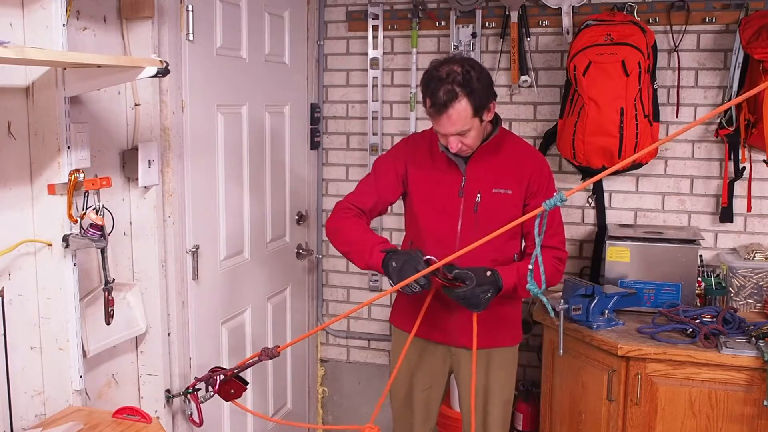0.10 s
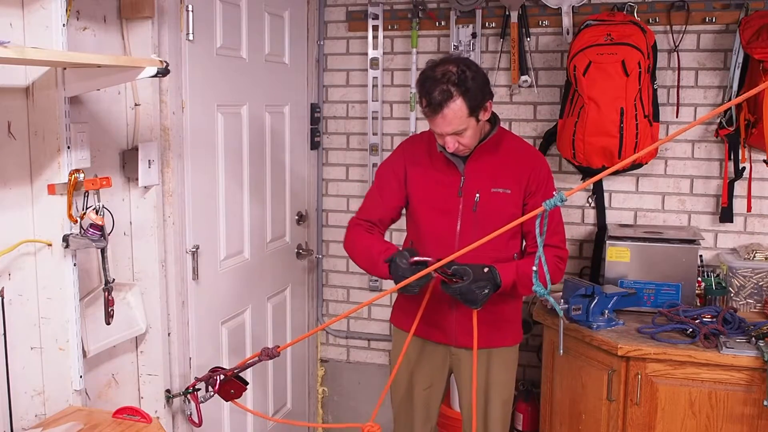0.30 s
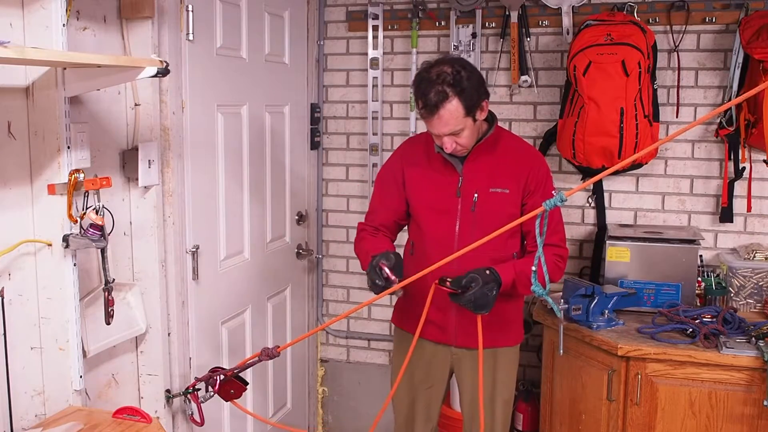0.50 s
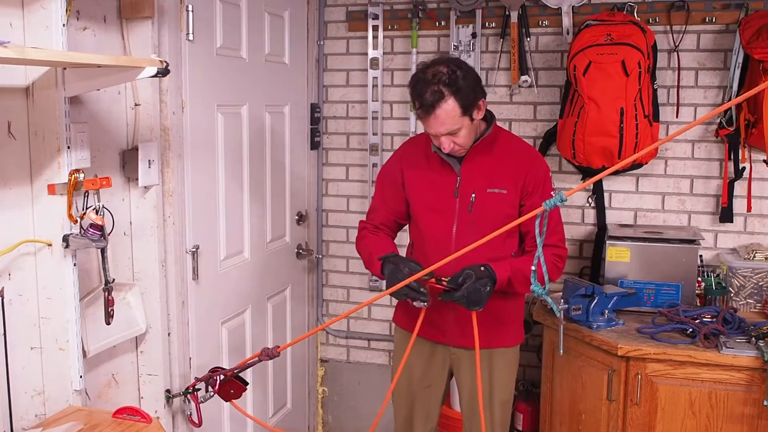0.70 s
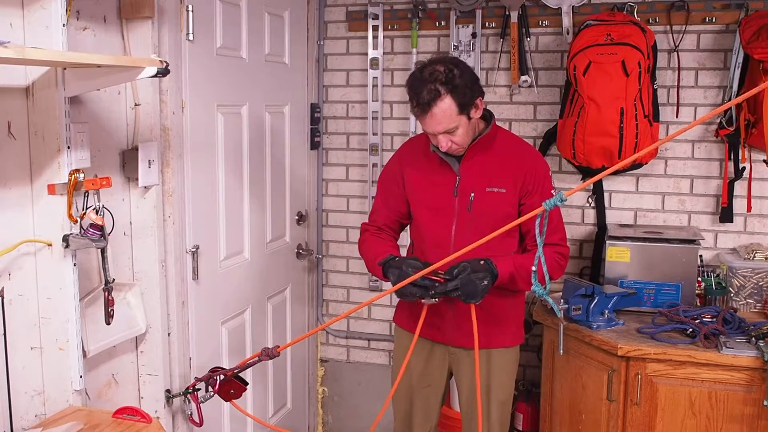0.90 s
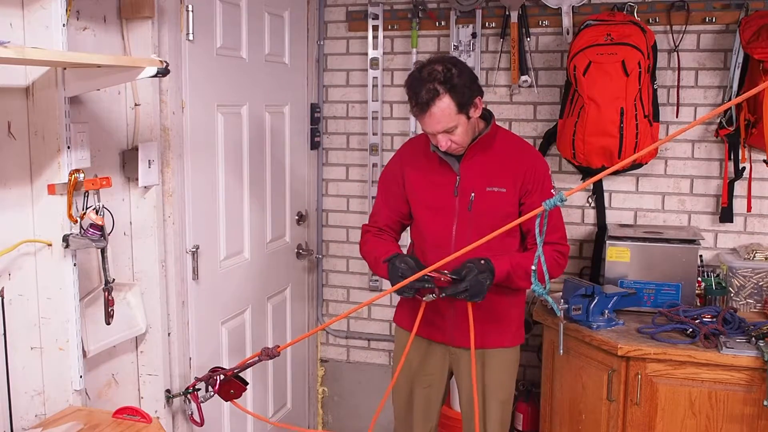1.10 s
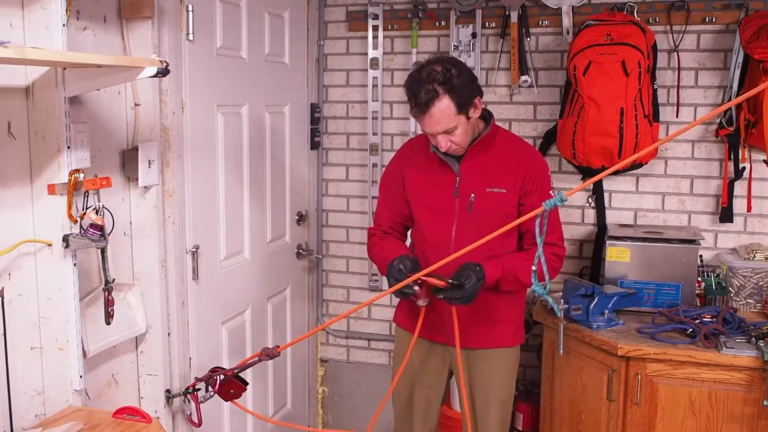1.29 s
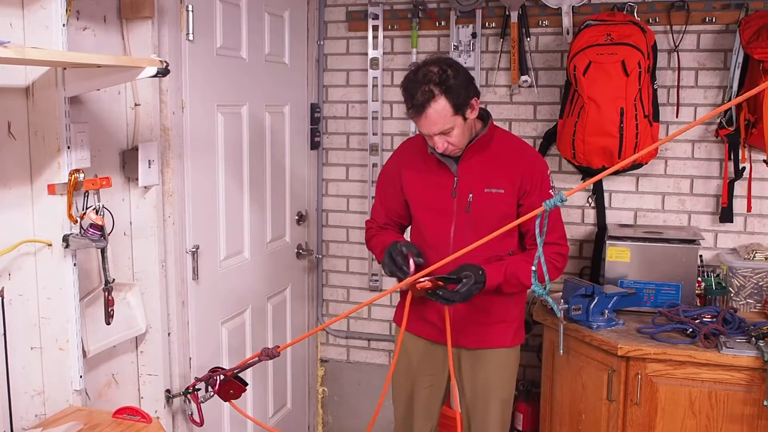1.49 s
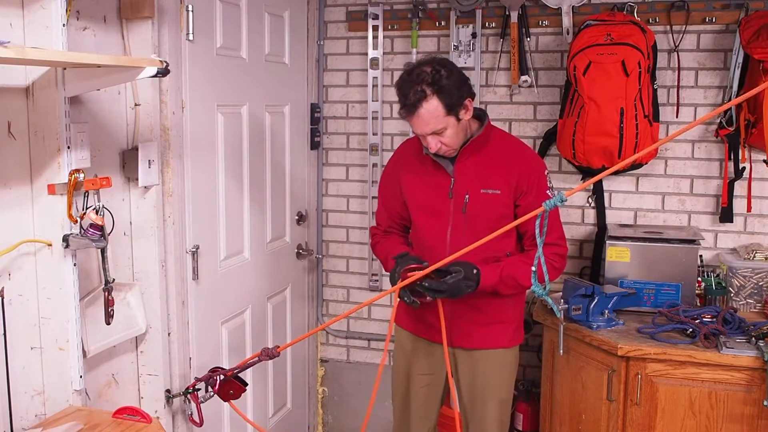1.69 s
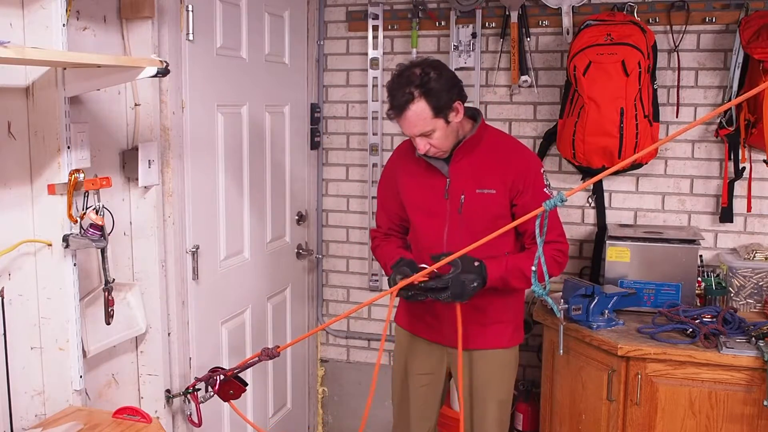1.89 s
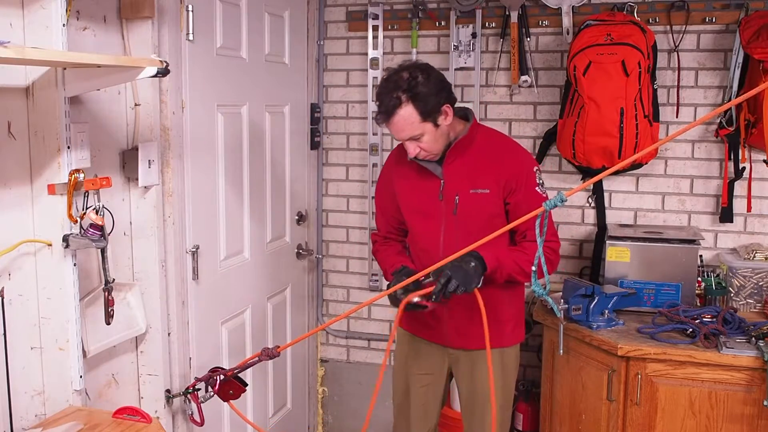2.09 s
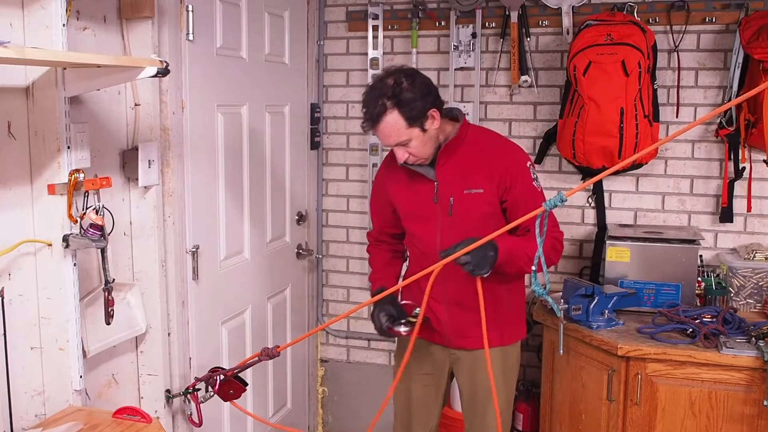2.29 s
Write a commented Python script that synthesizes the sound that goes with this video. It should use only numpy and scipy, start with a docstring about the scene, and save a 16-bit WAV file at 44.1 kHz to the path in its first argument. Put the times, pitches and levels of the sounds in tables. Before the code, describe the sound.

Metal carabiners and a pulley knock together: loud clacks and a bright click early, two firm double clacks mid-way, then lighter ringing clinks, over faint air hum and rope rustle, a few metres away in a reverberant garage.

```python
"""In a hard-walled garage, two metal carabiners and a pulley knock together in a person's hands, a few metres
from a stereo camera. Each knock is a short noise crack plus decaying sine modes of the struck piece; a random
tail with a decay for each band is the garage's answer. The two loudest overload the recorder with a one-sided
low thump, and one carabiner slides in a chatter of small contacts. Shaped noise makes the faint hum of air,
a low bump and a rustle."""
import sys
import numpy as np
from scipy import signal
from scipy.fft import rfft, irfft
from scipy.io import wavfile
from scipy.ndimage import uniform_filter1d

SR = 44100
rng = np.random.default_rng(int(sys.argv[2]) if len(sys.argv) > 2 else 0)


def volts_from_db(level):
    """Convert decibel levels to linear amplitude ratios."""
    exponent = np.asarray(level, float) / 20
    return 10 ** exponent


def inscribe(sig):
    """Save sig as 16-bit PCM at rate SR to the path in sys.argv[1].

    A 1-D sig is mono; a 2-D sig holds one channel per row.
    Samples are clipped to [-1, 1] before scaling.
    """
    pcm = np.round(np.clip(np.atleast_2d(sig).T, -1, 1) * 32767)
    wavfile.write(sys.argv[1], SR, pcm.astype(np.int16))


N = 105840  # samples, 2.4 s


def evened(x):
    """Normalization: scale to unit root mean square."""
    return x / np.sqrt(np.mean(x ** 2) + 1e-20)


def read(points, hz):
    """Spectral interpolation: a curve's value at any frequency, linear in log frequency."""
    f, value = np.transpose(points)
    return np.interp(np.log(hz + 1), np.log(f + 1), value)


def coloured(x, gain_db):
    """Minimum-phase filtering: the gain at each FFT bin alone fixes a causal response."""
    log_gain = np.log(volts_from_db(np.concatenate([gain_db, gain_db[-2:0:-1]])))
    spectrum = np.exp(np.conj(signal.hilbert(log_gain)))
    taps = np.fft.ifft(spectrum).real[:len(gain_db)]
    taps = taps.reshape((1,) * (x.ndim - 1) + (-1,))
    return signal.fftconvolve(x, taps, axes=-1)[..., :x.shape[-1]]


# Left-right correlation of the diffuse sound: pitch_hz, correlation
LIKENESS = [(60, 0.44), (240, 0.37), (950, 0.74), (3770, 0.42), (15000, -0.19)]


def diffuse_pair(frames, hz):
    """Diffuse-field coherence: two random short-time spectra, correlated by frequency."""
    a, b, c, d = rng.standard_normal((frames, len(hz), 4)).T
    left, other = a + 1j * b, c + 1j * d
    same = np.clip(read(LIKENESS, hz), -1, 1)[:, None]
    return np.array([left, same * left + np.sqrt(1 - same ** 2) * other])


def stereo_noise(colour):
    """Stationary noise: a diffuse pair shaped by a spectral density, at unit level."""
    hz = np.fft.rfftfreq(1024, 1 / SR)
    spectra = diffuse_pair(N // 256 + 5, hz) * volts_from_db(read(colour, hz))[:, None]
    return evened(signal.istft(spectra, nperseg=1024, noverlap=768)[1][:, :N])


# Spectral density of the hum of air: pitch_hz, level_db (per Hz, relative)
AIR_COLOUR = [(12, -36), (20, -25.5), (55, -3.5), (151, -11.5), (287, -17.5), (724, -18), (787, -17),
              (881, -16.5), (1040, -20.5), (1830, -23), (2630, -25.5), (14900, -32.5), (16300, -21)]


def room_tone():
    """Steady broadband noise: the faint hum of air."""
    level_db = -50
    return volts_from_db(level_db) * stereo_noise(AIR_COLOUR)


# Spectral density of the low bump: pitch_hz, level_db (per Hz, relative)
BUMP_COLOUR = [(50, -5), (105, -10), (200, -20), (450, -15.5), (900, -23), (2000, -42)]


def low_bump():
    """Amplitude modulation: low noise under a half-sine envelope makes one soft bump."""
    start_s, length_s, level_db = .63, .14, -49
    u = np.clip((np.arange(N) / SR - start_s) / length_s, 0, 1)
    return volts_from_db(level_db) * np.sin(np.pi * u) * stereo_noise(BUMP_COLOUR)


# Level of the rope and gloves over time: time_s, level_db
RUSTLE_LEVEL = [(0, -55), (.1, -57.5), (.5, -64), (.62, -49.5), (.72, -53), (.8, -71), (1.33, -81),
                (1.4, -53.5), (1.5, -48.5), (1.6, -51), (1.66, -57), (1.9, -57), (2.05, -55), (2.4, -56.5)]
# Spectral density of the rustle: pitch_hz, level_db (per Hz, relative)
RUSTLE_COLOUR = [(290, -42), (500, -21.5), (992, -6.5), (1100, -9), (1180, -16.5), (13700, -19),
                 (16300, -26.5)]


def rustle():
    """Friction noise: rope and gloves as shaped noise that follows a level curve."""
    level_db = np.interp(np.arange(N) / SR, *np.transpose(RUSTLE_LEVEL))
    return volts_from_db(level_db) * stereo_noise(RUSTLE_COLOUR)


# Reverberation time of each band, before the early boost: pitch_hz, t60_s
GARAGE_DECAY = [(500, 0.46), (1320, 0.53), (3480, 0.36), (9190, 0.31), (15000, .25)]


def garage():
    """Statistical reverberation: a fresh stereo tail, each band dying at its own speed."""
    level_db, gap_s = 3, .003
    early_db, early_t60_s = -5, 0.067  # near walls strengthen the start of the tail
    hz, t = np.fft.rfftfreq(256, 1 / SR), np.arange(420) * 64 / SR
    decay = volts_from_db(-60 * t / read(GARAGE_DECAY, hz)[:, None])
    tail = signal.istft(diffuse_pair(len(t), hz) * decay, nperseg=256, noverlap=192)[1]
    tail = tail * (1 + volts_from_db(early_db - 60 * np.arange(tail.shape[1]) / SR / early_t60_s))
    tail = np.pad(tail, ((0, 0), (round(gap_s * SR), 0)))
    return volts_from_db(level_db) * tail / np.linalg.norm(tail[0])


def knock(modes, crack, room_db, level_db, low_db, treble_db, ring_db, crack_t60_s):
    """Impact excitation: a dying contact crack and the modes it sets ringing, direct and through the garage."""
    t, hz = np.arange(SR // 2) / SR, np.fft.rfftfreq(4096, 1 / SR)
    tilt = [(1670, low_db), (3860, 0), (12000, treble_db)]  # Hz, dB
    rise_s = .00022 * volts_from_db(-.92 * level_db)  # softer knocks start more slowly
    rise = np.minimum(t / rise_s, 1)

    colour = read(crack, hz) + read(tilt, hz)
    push = rise * volts_from_db(-60 * np.maximum(t - rise_s, 0) / max(crack_t60_s, .001))
    burst = coloured(rng.standard_normal(len(t)) * push, colour)
    burst = burst / np.sqrt(np.mean(volts_from_db(2 * colour)))  # the colour leaves the overall power alone

    f, mode_db, t60 = np.transpose(modes)[:, :, None]
    partials = volts_from_db(mode_db + read(tilt, f) - 60 * t / t60) * np.sin(2 * np.pi * f * t)
    ring = partials.sum(0) * rise

    direct = volts_from_db(level_db - 6) * (burst + volts_from_db(ring_db) * ring)
    sound = volts_from_db(room_db) * signal.fftconvolve(direct[None], garage(), axes=1)
    sound[:, :len(t)] += direct
    return sound


# Low thumps as the two loudest knocks overload the recorder: start_s, level_db, length_s
THUMPS = [(0.329, -36, 0.0038), (0.4327, -20.5, 0.00076)]


def overload_thumps():
    """Asymmetric overload: a one-sided low thump, drawn as a raised cosine, at the two loudest knocks."""
    out, t = np.zeros(N), np.arange(N) / SR
    for start_s, level_db, length_s in THUMPS:
        u = np.clip((t - start_s) / length_s, 0, 1)
        out += volts_from_db(level_db) * np.sin(np.pi * u) ** 2
    return out


# Left minus right level at the microphone ports: pitch_hz, difference_db
PORT_LEVELS = [(60, -2), (120, 5.5), (240, -2), (480, 9), (950, -2), (1890, -0.5), (3770, -1), (7520, 4.5),
               (15000, -7)]
# Phase between the ports: pitch_hz, phase_rad
PORT_PHASES = [(2500, 0), (5000, 0.19), (9000, 1.49), (15000, 1.8)]


def through_ports(x):
    """Interchannel difference: level and phase split evenly and oppositely between the two ports."""
    hz = np.fft.rfftfreq(N, 1 / SR)
    half = volts_from_db(read(PORT_LEVELS, hz) / 2) * np.exp(.5j * read(PORT_PHASES, hz))
    return irfft(rfft(x) * np.array([half, 1 / half]), N)


# Knocks of each piece: start_s, level_db, low_db, treble_db, ring_db (over the crack), crack_t60_s
BIG_KNOCKS = [(-.06, -23.5, 10, 0, -6, 0.034), (.151, -34, 2.5, -6.5, 3, 0.12),
              (.1965, -15, 4.5, 1, -16, 0.015), (.199, -13, 5, -5.5, -16, 0.031),
              (.245, -39, -5, 13, -15, 0.024), (.2693, -24, 6.5, -5, -0.5, 0.034),
              (.296, -35, 11, 9, -0.5, 0.023), (.331, 1.5, -6.5, 2, -8, 0.035),
              (.8014, -1.5, -6, -4, -7, .012), (.8045, -7.5, 2.5, -5, -9.5, .02),
              (.9, -29.5, 7, -11, 5.5, 0.037), (.925, -35, 14, -3, -16, 0.047),
              (1.0022, -11, 6, 8.5, -36, 0.021), (1.011, -11, 4, -49, -16, 0.01)]
SMALL_KNOCKS = [(1.7025, -11.5, -1, -5, -17, 0.034), (1.7888, -9, 0, -4.5, -15.5, 0.026),
                (1.8775, -11.5, -7.5, -3.5, -10.5, 0.017), (1.936, -22.5, -4, 0, -18, 0.017),
                (2.1066, -11.5, -6, 7, -15, 0.025), (2.147, -17, -6, 1, -17.5, 0.016),
                (2.162, -39, 3.5, -9, -21, 0.012)]
PULLEY_KNOCKS = [(.4325, 3, 4.5, -5.5, -4.5, 0.01), (.481, -11.5, 9.5, -4.5, -3, 0.017),
                 (.5212, -17, 13, -12.5, 1, 0.017)]
SLIDE_KNOCKS = [(1.355, -40, 12, 1, -11, 0.04), (1.376, -40, -6, 0, -12, 0.017),
                (1.388, -28, 7, 3.5, -10, 0.012), (1.399, -30, -0.5, 4, -5, 0.0098),
                (1.413, -32, 8.5, -1, -8, 0.0079)]  # a carabiner slides into place in a chatter of small contacts
SPINE_KNOCKS = [(1.7025, -23.5, -25, 0.011, 0.5, 0.0057), (1.7888, -20.5, -0.5, 0, 4.5, 0.0017),
                (1.8775, -25, -25, 0, -8, 0.0037), (2.1066, -25.5, -5, 0, -2, .003),
                (2.147, -26, -18, 0, -2.5, 0.0035)]  # the spine of the small carabiner hangs free and rings on
# Ringing modes of each piece: pitch_hz, level_db (relative), t60_s
BIG_MODES = [(834, -24, 0.092), (1537, -17, 0.13), (2021, -13, 0.067), (2200, -15, 0.11), (2510, -18, 0.13),
             (3235, -13, 0.093), (3480, -11, 0.052), (3730, -12.5, 0.037), (4350, -29, .1),
             (4650, -3, 0.026), (5290, -8.5, 0.014), (6600, -4, 0.038), (7800, -25, .05),
             (8750, -31, 0.043), (10870, -18, 0.066), (11020, -21, 0.08), (14100, -9, 0.11),
             (14800, -19, 0.1)]
SMALL_MODES = [(1593, -9.5, 0.12), (1790, -34, 0.19), (2720, -25, 0.055), (3714, 1, 0.075), (3890, -7, .08),
               (4660, -2, 0.1), (5500, -26, 0.067), (6160, 2, 0.073), (7510, 4, 0.076), (9180, -14, 0.035),
               (10100, -16, .06), (10600, -68, .05), (13700, -1, 0.06), (15300, -21, 0.023)]
PULLEY_MODES = [(4102, -35, 0.035), (4810, -24, 0.027), (9040, -8.5, .05), (11160, -24.5, .05),
                (12520, -9, .05), (13080, 1, 0.09), (13800, -35, .06), (13610, 1.5, 0.099),
                (13180, 1.5, 0.064), (13900, -6, 0.072), (13370, -2, .07), (14310, 0, .06),
                (14630, -5, 0.069), (15560, -25, 0.037), (15105, -2, 0.049), (15000, -8, 0.046)]
SLIDE_MODES = [(1560, -7, 0.078), (2365, -3.5, 0.059), (4380, 8, 0.066), (5000, 4.5, 0.054),
               (6261, -8, 0.069), (8200, -7, .05), (10900, -0.5, 0.055), (11000, -14, .04),
               (15000, -13, 0.034)]
SPINE_MODES = [(1685, -8, .14), (3257, 0, .3), (4673, -7, .28), (6200, -10, .28), (7510, -11, .35)]
# Spectral density of each crack: pitch_hz, level_db (per Hz, relative)
BIG_CRACK = [(200, -23), (600, -29.5), (900, -17.5), (1500, -4.5), (2600, -4.5), (3300, 4), (4700, 0.5),
             (5400, 0), (6380, 2), (8060, -3.5), (9300, -0.5), (12000, -5), (16300, -9.5)]
SMALL_CRACK = [(300, -72), (900, -29), (1300, -16.5), (1700, -2), (2500, -7.5), (3270, -1), (3800, 2),
               (5050, -2), (7500, -5.5), (11100, -8), (12400, -8), (13800, -10), (16300, -11)]
PULLEY_CRACK = [(300, -58), (1500, -37.5), (2800, -29.5), (3600, -11), (6000, -10), (9300, -5),
                (11500, -3.5), (12600, 2), (13300, -11), (15200, -4), (16300, -7)]


def hardware():
    """Linear superposition: the knocks of every piece of metal add, with the thumps, in the two channels."""
    spine_room_db = -9  # the long, clear ring stays mostly direct, with little garage tail
    pieces = [(BIG_KNOCKS, BIG_MODES, BIG_CRACK, 0),
              (SMALL_KNOCKS, SMALL_MODES, SMALL_CRACK, 0),
              (PULLEY_KNOCKS, PULLEY_MODES, PULLEY_CRACK, 0),
              (SLIDE_KNOCKS, SLIDE_MODES, BIG_CRACK, 0),
              (SPINE_KNOCKS, SPINE_MODES, SMALL_CRACK, spine_room_db)]
    lead = 4410  # samples of room for a knock that begins before time zero
    out = np.zeros((2, N + lead + 2 * SR))
    for knocks, modes, crack, room_db in pieces:
        for start_s, *row in knocks:
            sound = knock(modes, crack, room_db, *row)
            at = lead + round(start_s * SR)
            out[:, at:at + sound.shape[1]] += sound
    return through_ports(out[:, lead:lead + N] + overload_thumps())


def scene():
    """Superposition: the hardware over the room tone, bump and rustle."""
    return hardware() + room_tone() + low_bump() + rustle()


# Frequency response of the microphone: pitch_hz, gain_db
MIC_RESPONSE = [(30, -8.5), (90, 2), (11600, 0.5), (12100, -3), (12700, -1.5), (13100, 0.5), (15700, 2.5),
                (16200, -18.5)]


def microphone(x):
    """Linear transduction: the microphone's frequency response colours the sound."""
    return coloured(x, read(MIC_RESPONSE, np.fft.rfftfreq(8192, 1 / SR)))


def duck_db(dry):
    """Gain control: power over a threshold turns the level down, then lets it recover steadily."""
    threshold_db, share, over_fall_db_per_s = -18, 0.2, 82
    power = uniform_filter1d((dry ** 2).mean(0), 400, origin=199)
    power_db = 10 * np.log10(abs(power) + 1e-12)
    fall = np.arange(N) * over_fall_db_per_s / SR
    held_db = np.maximum.accumulate(power_db + fall) - fall  # peak hold with a straight fall in dB
    over_db = np.maximum(held_db - threshold_db, 0)
    return share * uniform_filter1d(over_db, 200, origin=99)


def top_cut(x):
    """Nothing passes above the cut-off."""
    return signal.sosfilt(signal.butter(12, 16410, fs=SR, output="sos"), x)


def record(dry):
    """Signal chain: microphone colour, ducking after loud knocks, offset, hard clipping and band limit."""
    offset, edge_hz = -.0042, 16300
    levelled = microphone(dry) / volts_from_db(duck_db(dry))
    clipped = np.clip(levelled + offset, -1, 1)
    low_pass = signal.firwin(255, edge_hz, window=("kaiser", 9), fs=SR)
    mix = signal.oaconvolve(clipped, low_pass[None], "same")
    return top_cut(mix)


dry = scene()
out = record(dry)
inscribe(out)
```